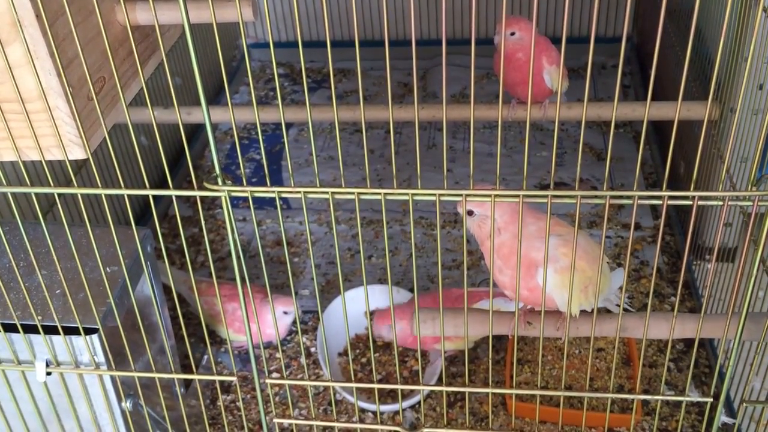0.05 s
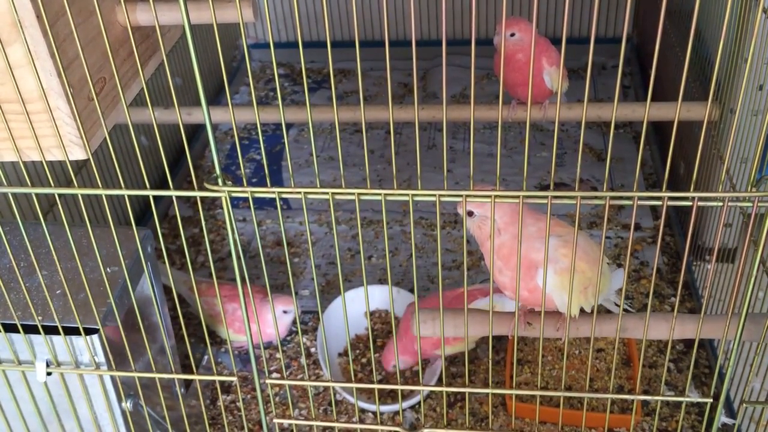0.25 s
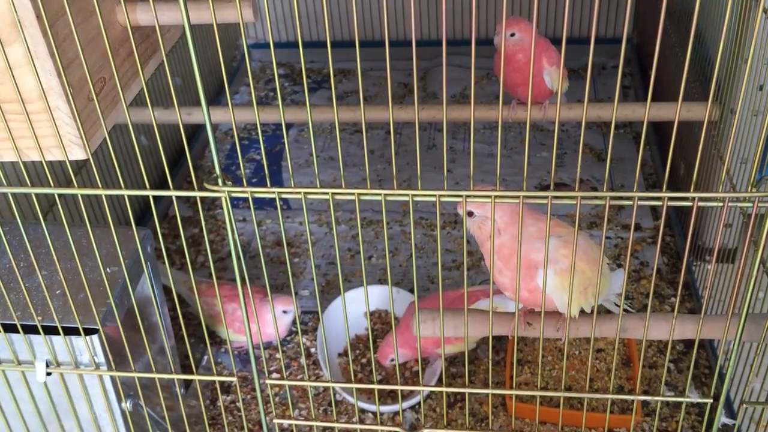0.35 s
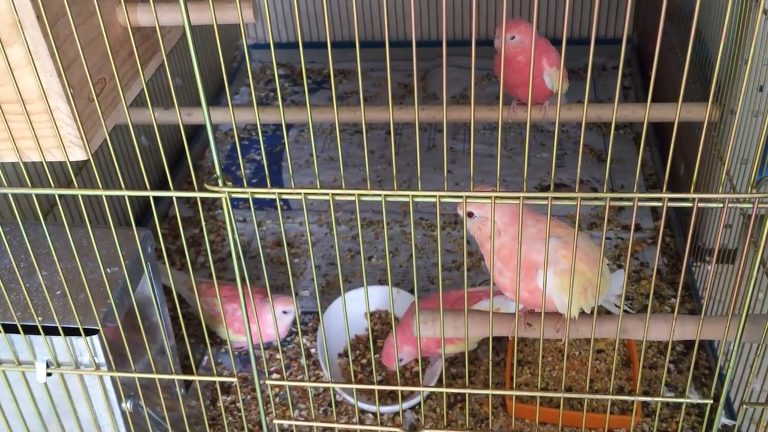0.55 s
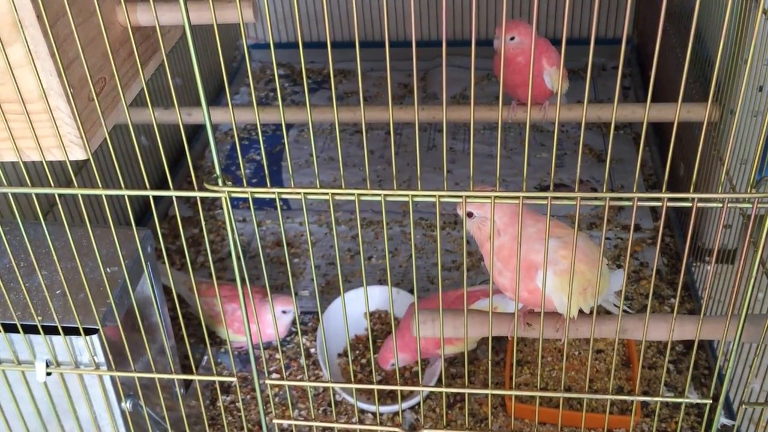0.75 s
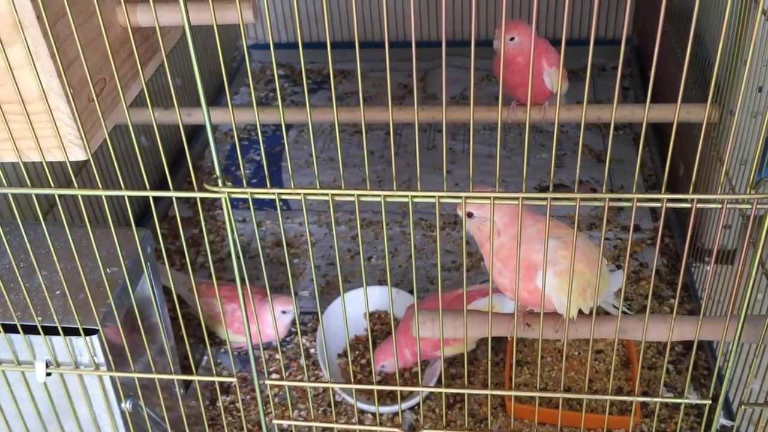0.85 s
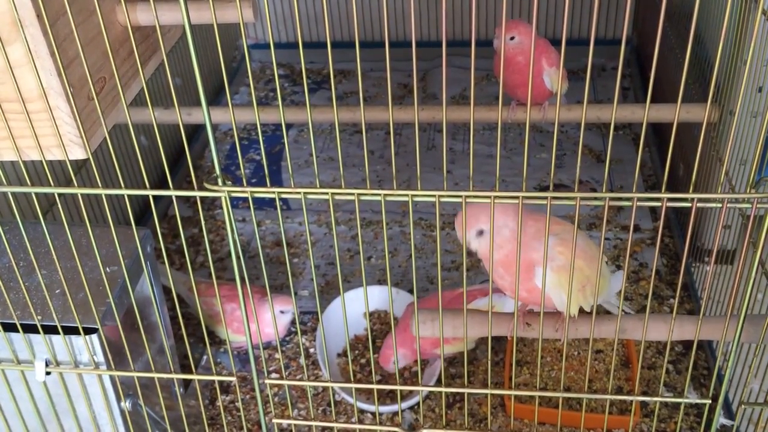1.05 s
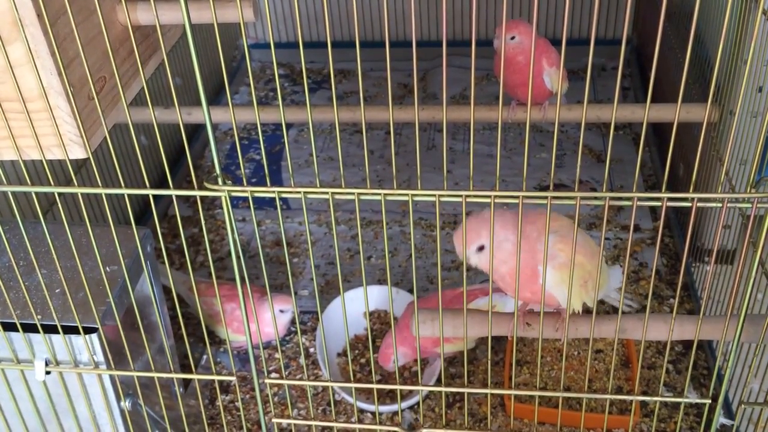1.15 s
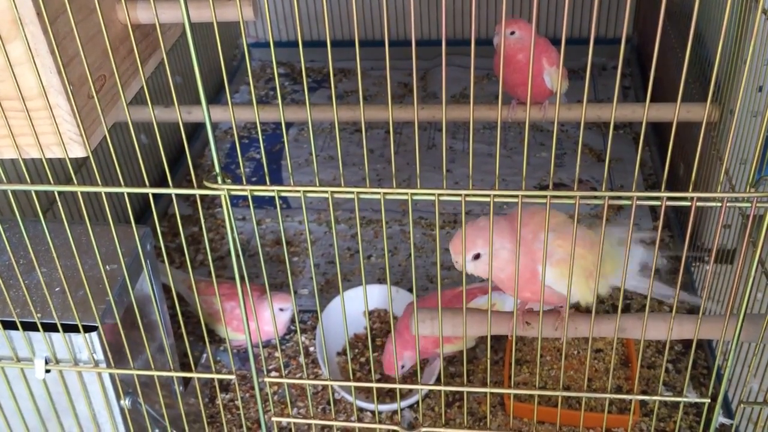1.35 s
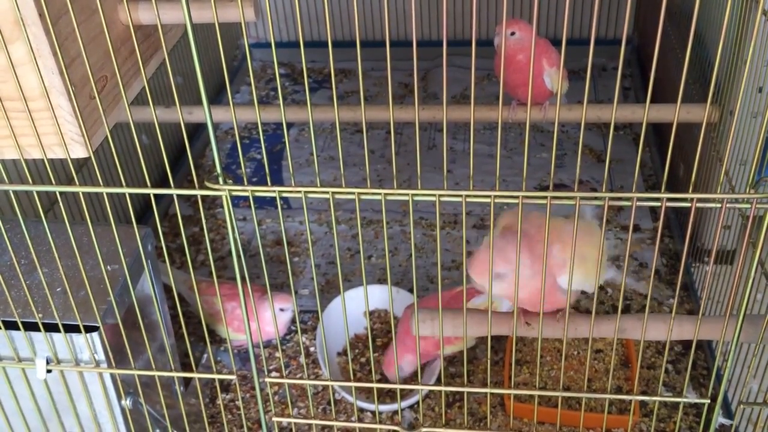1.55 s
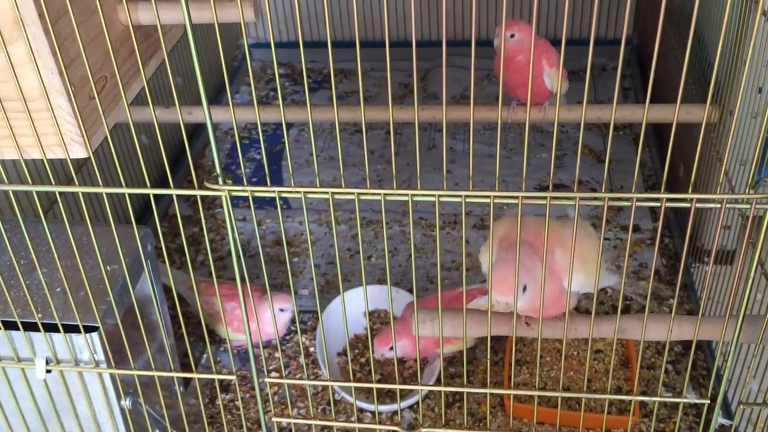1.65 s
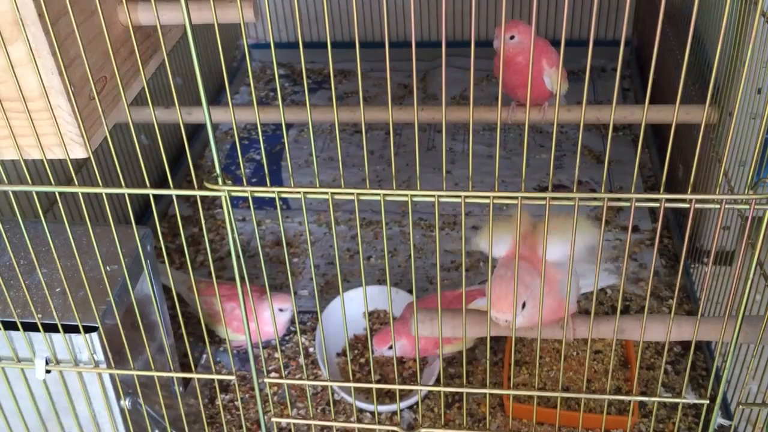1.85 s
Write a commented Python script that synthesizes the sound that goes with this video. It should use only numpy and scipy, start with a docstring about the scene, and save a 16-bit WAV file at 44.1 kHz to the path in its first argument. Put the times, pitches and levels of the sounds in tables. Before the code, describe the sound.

Parakeets feed in a wire cage, with small seed cracks and rustling husks from about 0.2 seconds. At 0.4 seconds wings burst with a low thump and fade. A short rough chirp comes near 0.9 seconds, then a reedy, rising whistle from 1.1 to 1.3. Sharp cracks cluster around 1.5 seconds, followed by dull knocks until 1.8. A faint room rumble and hiss lie underneath.

```python
"""Parakeets feed in a wire cage in a small room: beaks crack seed and tick on the dish, and husks rustle.
A burst of wings pushes air and dies away, then a bird gives a short chirp and a reedy, rising whistle.
Dull knocks and light taps come and go, with one low thump as the wings start.
Soft jolts ring low and middle resonances of room and cage; a low rumble and faint hiss lie underneath."""
import sys
import numpy as np
from scipy import signal
from scipy.fft import rfft, irfft, next_fast_len
from scipy.io import wavfile

SR = 44100
rng = np.random.default_rng(int(sys.argv[2]) if len(sys.argv) > 2 else 0)


def persist_wave(psi):
    """Save psi, clipped to +-1, as 16-bit WAV."""
    counts = np.round(np.clip(psi, -1, 1) * 32767).astype(np.int16)
    wavfile.write(sys.argv[1], SR, np.atleast_2d(counts).T)


N = 83790
TIME = np.arange(N) / SR
# slow swell of the room rumble: time_s, level_db
RUMBLE_SWELL = [(0, -58.5), (0.1, -65.5), (0.24, -61.5), (0.7, -61.5), (1.0, -59), (1.2, -56.5),
                (1.38, -61), (1.5, -57.5), (1.75, -59), (1.9, -59)]


def beaks(crack_t60_s=.0016, dish_echo_s=.0031, scatter_t60_s=.089):
    """Beaks crack seed: each snap is followed by an echo off the dish and a scatter among the bars."""
    # beak clicks and seed cracks: start_s, relative_level_db, tilt_db_per_octave, low_cut_hz
    cracks = [(0.2032, -22.5, -9.5, 3150), (0.2068, -36, 9, 4000), (0.5649, -37.5, 5, 1200),
              (0.6795, -57, -10, 2500), (0.695, -39, 2, 1100), (0.6974, -32.5, -1.5, 1200),
              (0.7127, -63, 4, 1200), (0.844, -35.5, -2.5, 2400), (1.4665, -28, 4, 1490),
              (1.4702, -25.5, 21, 1500), (1.4742, -26.5, -2, 1270), (1.4771, -28.5, 4, 1210),
              (1.4815, -31.5, 0, 1200), (1.486, -34, 4, 1530), (1.4932, -45, 16, 1500),
              (1.5805, -48.5, -5, 1490), (1.5855, -26.5, 1.5, 1100), (1.5892, -35, 0.5, 1140),
              (1.598, -46, 2, 1500), (1.6755, -44, 20, 3040), (1.715, -42, -6.5, 2020)]
    # bright tone of a crack: frequency_hz, gain_db
    crack_eq = [(500, -48), (950, -18), (1400, 1.5), (2300, -1.5), (3000, -5.5), (4000, -1.5), (5000, -7.5),
                (6500, -0.5), (10500, -5.5), (13000, 0.5), (15000, -3)]
    out, size = np.zeros(2 * N), SR // 10
    for start_s, db, tilt, low_cut_hz in cracks:
        snap = burst(crack_t60_s)
        dish_echo = from_db(-3.5) * delayed(burst(crack_t60_s), dish_echo_s)
        scatter = from_db(1) * burst(scatter_t60_s)
        low_cut = signal.butter(4, low_cut_hz, "high", fs=SR, output="sos")
        hit = signal.sosfilt(low_cut, snap + dish_echo + scatter)
        start = int(start_s * SR)
        out[start:start + size] += 2 * from_db(db + 2) * colour(hit[:size], crack_eq, tilt)
    return room(out[:N], wet_db=-11, t60_s=.24)


def husks(grains_per_s=2500):
    """Stirred husks swell as tiny grains and soft rubbing, over a light sifting of seed."""
    # continuous sifting: time_s, level_db
    sifting = [(0, -76.5), (0.3, -71), (0.8, -75), (1.0, -73), (1.39, -73), (1.44, -68), (1.56, -68),
               (1.7, -68.5), (1.9, -67.5)]
    # its nearly flat tone: frequency_hz, gain_db
    sifting_eq = [(1500, -1), (4000, 0), (9000, -0.5), (15000, -0.5)]
    # stirs of the husks: peak_s, level_db, rise_s, fall_s, tilt_db_per_octave
    rustles = [(0.205, -55.5, 0.029, 0.014, -7), (0.247, -53.5, 0.021, 0.018, -8),
               (0.61, -50.5, 0.033, 0.033, -6.5), (0.681, -49, 0.0074, 0.0098, -2),
               (0.702, -49, 0.01, 0.012, 1), (0.842, -54.5, 0.012, 0.016, -9.5),
               (0.89, -62, 0.029, 0.13, -8), (1.056, -56, 0.027, 0.015, -2.5),
               (1.163, -55, 0.041, 0.039, -1), (1.22, -59, 0.024, 0.014, 8),
               (1.313, -54.5, 0.006, 0.026, 1), (1.348, -59, 0.021, 0.014, 7.5),
               (1.637, -56, 0.014, 0.028, -5), (1.665, -58, 0.0064, 0.051, -7.5),
               (1.715, -66, 0.016, 0.25, -7.5), (1.842, -64, 0.023, 0.051, -8)]
    # dry, papery tone of husks: frequency_hz, gain_db
    husk_eq = [(300, -16), (800, -9), (1500, -1.5), (2800, 0.5), (4300, 2.5), (6500, 7.5), (10000, -3),
               (15000, -4.5)]
    out = level(sifting) * noise(sifting_eq)
    for peak_s, db, rise_s, fall_s, tilt in rustles:
        grains = rms_one((rng.random(N) < grains_per_s / SR) * rng.standard_normal(N))
        rub = rms_one(rng.standard_normal(N) + from_db(-1) * grains)
        swell = np.exp(-np.maximum((peak_s - TIME) / rise_s, (TIME - peak_s) / fall_s))
        out += from_db(db) * swell * colour(rub, husk_eq, tilt)
    return out


def wings():
    """Feathers swish and sizzle briefly; the flutter and the low push of air last longer."""
    # envelopes of the four layers of the wing burst: time_s, level_db
    swish = [(0.372, -105), (0.388, -42), (0.402, -39), (0.43, -45.5), (0.46, -53), (0.505, -52),
             (0.535, -52), (0.565, -71), (0.66, -63.5)]
    sizzle = [(0.382, -78), (0.405, -46), (0.45, -53.5), (0.51, -55.5), (0.56, -63)]
    flutter = [(0.375, -74), (0.393, -43), (0.425, -42), (0.452, -46.5), (0.495, -42), (0.565, -52),
               (0.625, -55), (0.66, -60), (0.71, -54), (0.8, -75)]
    push = [(0.378, -56), (0.398, -41.5), (0.48, -37), (0.56, -42), (0.64, -45), (0.76, -53), (0.89, -51.5),
            (1.0, -69)]
    # bright swish, top-end sizzle, midrange flutter, bass push: frequency_hz, gain_db
    swish_eq = [(1000, -34), (2000, -3), (2900, -5), (4300, 5), (5000, -0.5), (6500, 0.5), (8000, -14.5),
                (10500, -22), (15500, -22)]
    sizzle_eq = [(5000, -1.5), (8000, 5), (9500, 3.5), (10400, -2), (11500, 0), (14000, -2), (15300, -15)]
    flutter_eq = [(150, -13.5), (270, -2), (380, 6), (520, -6), (800, 3), (1120, 7), (1700, 1),
                  (2600, -3.5), (5000, -13), (12000, -43)]
    push_eq = [(20, -23), (40, -23), (56, 3), (72, 7), (95, -10), (123, -3), (148, -24.5), (185, -7.5),
               (240, -22), (400, -17), (1500, -57.5)]
    feathers = level(swish) * noise(swish_eq) + level(sizzle) * noise(sizzle_eq)
    return feathers + level(flutter) * noise(flutter_eq) + level(push) * noise(push_eq)


def calls():
    """A rough chirp, a thin lead-in and a reedy whistle; wall echoes beat with the glide and thicken it."""
    # contours of the chirp and the lead-in: time_s, pitch_hz, level_db
    chirp = [(0.863, 2150, -59), (0.87, 2344, -56), (0.874, 2757, -48.5), (0.884, 2545, -57),
             (0.895, 2340, -51.5), (0.906, 2140, -60), (0.915, 2040, -68)]
    lead_in = [(1.035, 4530, -67), (1.048, 4330, -59), (1.058, 3850, -57), (1.066, 4250, -74)]
    # the whistle dips, then climbs: time_s, pitch_hz, level_db, reediness_db
    whistle = [(1.07, 2253, -67.5, -12), (1.088, 2294, -45, -8), (1.102, 2162, -46.5, -0.5),
               (1.116, 2082, -41.5, 1), (1.128, 2126, -44.5, -5), (1.141, 2250, -45, -29),
               (1.15, 2716, -51.5, -10), (1.168, 2875, -52.5, -4), (1.2, 2933, -48.5, -8),
               (1.217, 3140, -51.5, -1.5), (1.24, 3392, -55, -3), (1.262, 3340, -59, 1.5),
               (1.286, 3203, -59.5, -3), (1.305, 3330, -67, 0)]
    # overtones from the second harmonic up: gain_db
    chirp_overtones = [-11, -22, -13]
    whistle_overtones = [-8.5, -14.5, -21]
    # reflections off nearby walls: delay_s, gain_db
    walls = [(.011, -7.5), (.019, -8), (.03, -14), (.047, -10)]
    voice = (bird_note(chirp, chirp_overtones, jitter=.065) + bird_note(lead_in, [])
             + bird_note(whistle, whistle_overtones))
    echoes = sum(from_db(db) * delayed(voice, delay_s) for delay_s, db in walls)
    return room(voice, wet_db=-1, t60_s=.23) + echoes


def bird_note(contour, overtones_db, jitter=.0139, throb_hz=139.2):
    """A gliding tone with an unsteady pitch, a fast throb and a rasp; the throat shapes its overtones."""
    # the throat favours overtones near 6.6 kHz: frequency_hz, gain_db
    throat_eq = [(4400, -1), (5700, 0), (6600, 3), (8500, -0.5), (9800, -8.5)]
    time_s, hz, db, *reediness_db = np.transpose(contour)
    pitch = np.interp(TIME, time_s, hz)
    phase = 2 * np.pi * np.cumsum(pitch * (1 + jitter * waver(hz=168))) / SR
    bite = from_db(np.interp(TIME, time_s, reediness_db[0])) if reediness_db else 1
    tone = np.sin(phase)
    for harmonic, overtone_db in enumerate(overtones_db, 2):
        throat_db = np.interp(harmonic * pitch, *np.transpose(throat_eq))
        tone += bite * from_db(overtone_db + throat_db) * np.sin(harmonic * phase)
    throb = 1 + .4 * np.sin(2 * np.pi * throb_hz * TIME + waver(hz=8.6))
    rasp = 1 + .087 * waver(hz=200)
    return level(np.c_[time_s, db]) * throb * rasp * tone


def knocks(rise_s=.0069):
    """Dull knocks and light taps, and one low thump as the wings start: short, soft-edged tones."""
    # knocks, taps and the thump: start_s, level_db, pitch_hz
    hits = [(0.203, -54, 1603), (0.396, -36, 77.5), (0.583, -52.5, 379), (0.624, -46.5, 460),
            (1.235, -55, 600), (1.346, -60.5, 1475), (1.567, -46, 183), (1.682, -46.5, 152),
            (1.753, -41.5, 162), (1.825, -45, 175), (1.834, -60, 1570)]
    out = np.zeros(N)
    for start_s, db, hz in hits:
        age = np.maximum(TIME - start_s, 0)
        swell = (age / rise_s * np.exp(1 - age / rise_s)) ** 2
        phase = 2 * np.pi * (hz * age + rng.random()) + .5 * waver(hz / 4)
        out += from_db(db) * swell * np.sin(phase)
    return out


def resonances(t60_s=.22):
    """Low and middle resonances of room and cage, rung by soft jolts."""
    # jolts: peak_s, relative_level_db, width_s
    jolts = [(0.189, -52.5, 0.017), (0.255, -50, 0.015), (0.41, -48.5, 0.01), (0.507, -44.5, 0.046),
             (0.612, -50, 0.021), (0.686, -52, 0.048)]
    # resonances of room and cage: pitch_hz, gain_db
    modes = [(328, -7), (372, 0), (424, 2), (560, -1.5), (1056, -6), (1184, -10), (1398, -8), (1454, -4.5),
             (1590, -9), (4349, -23)]
    out = np.zeros(N)
    decay = from_db(-60 / (t60_s * SR))
    for peak_s, db, width_s in jolts:
        push = np.exp(-.5 * ((TIME - peak_s) / width_s) ** 2) + 1e-9
        for hz, mode_db in modes:
            poles = [1, -2 * decay * np.cos(2 * np.pi * hz / SR), decay ** 2]
            ring = signal.lfilter([1, 0, -1], poles, push * rng.standard_normal(N))
            out += .5 * from_db(db + mode_db) * ring / np.abs(ring).max()
    return out


def room_tone():
    """Faint, steady air under a slowly wavering rumble and its drones."""
    # tone of the air and of the rumble: frequency_hz, gain_db
    air_eq = [(20, -32), (60, 8.5), (200, -6.5), (330, 5.5), (420, -8.5), (630, 3.5), (780, -11.5),
              (1000, -2), (1400, -12), (2000, -9), (4000, -18), (8000, -27.5), (15000, -36.5)]
    rumble_eq = [(20, -78), (42, -43), (63, 3.5), (90, -6), (125, 9.5), (165, 3), (220, -19.5), (270, -13),
                 (325, -1), (420, -25.5), (1200, -69.5)]
    return from_db(-65.5) * noise(air_eq) + level(RUMBLE_SWELL) * noise(rumble_eq) + drones()


def drones():
    """Narrow, low resonances of the room swell and sink with the rumble."""
    # room resonances: pitch_hz, level_db, width_hz
    modes = [(63.1, -66, 6.2), (116, -63, 37), (166.3, -63, 18), (322.6, -72.5, 7.3)]
    out = np.zeros(N)
    for hz, db, width_hz in modes:
        b, a = signal.iirpeak(hz, hz / width_hz, fs=SR)
        ring = signal.lfilter(b, a, rng.standard_normal(N + SR // 4))[-N:]  # already ringing at the start
        out += from_db(db) * rms_one(ring)
    return out * rms_one(level(RUMBLE_SWELL))


def room(x, wet_db, t60_s):
    """Direct sound plus the short tail of the room."""
    return x + from_db(wet_db) * signal.fftconvolve(x, burst(t60_s, delay_s=.0019))[:N]


def from_db(db):
    """Decibels to gain."""
    return 10 ** (np.asarray(db) / 20)


def rms_one(x):
    """Scale to rms 1."""
    return x / np.sqrt(np.mean(x ** 2) + 1e-20)


def level(envelope):
    """Gain along a (time_s, level_db) envelope, silent outside it."""
    time_s, db = np.transpose(envelope)
    return from_db(np.interp(TIME, time_s, db, left=-150, right=-150))


def colour(x, eq, tilt=0):
    """A (frequency_hz, gain_db) EQ with a tilt in dB per octave; keeps the power of white noise."""
    size = 2 * next_fast_len(len(x))
    octave = np.log2(np.maximum(np.fft.rfftfreq(size, 1 / SR), 10))
    hz, db = np.transpose(eq)
    tilt_db = tilt * np.clip(octave, np.log2(hz[0]), np.log2(hz[-1]))
    gain = from_db(np.interp(octave, np.log2(hz), db) + tilt_db)
    # minimum phase, so nothing rings ahead of an attack
    cepstrum = irfft(np.log(rms_one(gain)))
    cepstrum[1:size // 2] *= 2
    cepstrum[size // 2 + 1:] = 0
    return irfft(rfft(x, size) * np.exp(rfft(cepstrum)))[:len(x)]


def noise(eq):
    """Coloured noise of rms 1."""
    return rms_one(colour(rng.standard_normal(N), eq))


def burst(t60_s, delay_s=0):
    """Dying noise of unit energy."""
    x = rng.standard_normal(N) * from_db(-60 * np.minimum(TIME / t60_s, 10)) * (TIME >= delay_s)
    return x / np.sqrt(np.sum(x ** 2))


def waver(hz):
    """Random wobble of rms 1, mostly slower than hz."""
    return rms_one(signal.sosfilt(signal.butter(2, hz, fs=SR, output="sos"), rng.standard_normal(N)))


def delayed(x, delay_s):
    """The same sound arriving later."""
    return np.interp(TIME - delay_s, TIME, x, left=0)


def scene():
    """The birds, their cage and the room, in mono."""
    return (beaks() + husks() + wings() + resonances() + knocks() + calls() + room_tone())[None]


def record(dry):
    """A steep high cut takes off the very top."""
    cutoff_hz = 15300
    return signal.sosfilt(signal.ellip(10, .2, 60, cutoff_hz, fs=SR, output="sos"), dry)


dry = scene()
out = record(dry)
persist_wave(out)
```